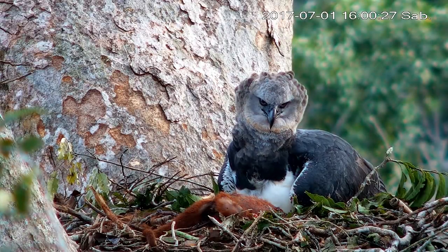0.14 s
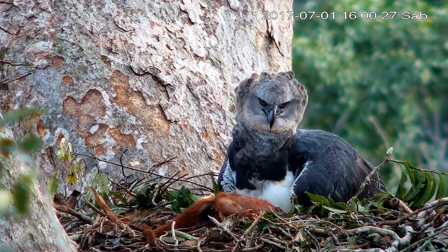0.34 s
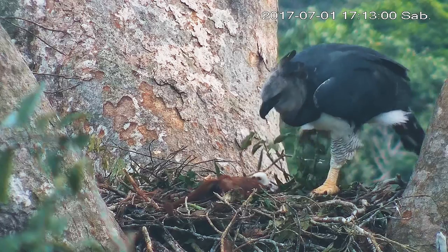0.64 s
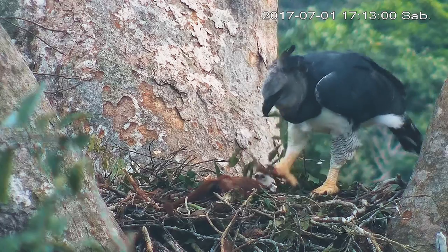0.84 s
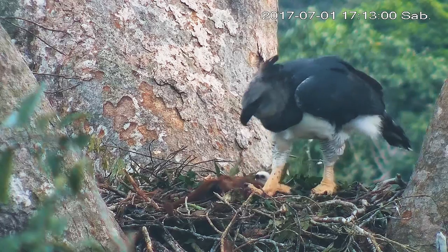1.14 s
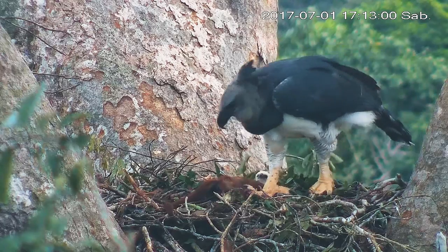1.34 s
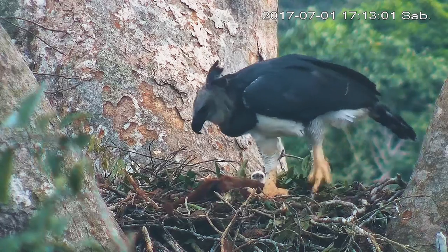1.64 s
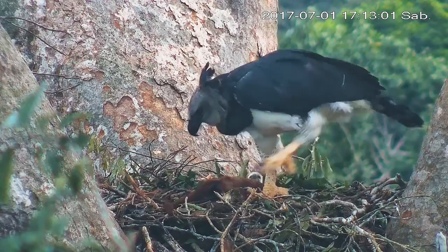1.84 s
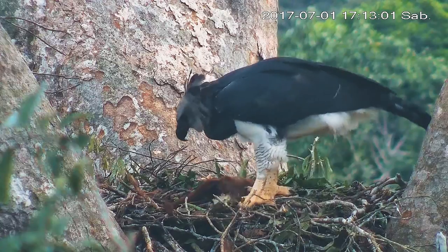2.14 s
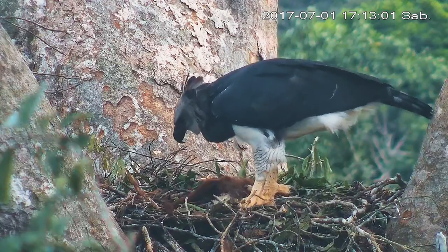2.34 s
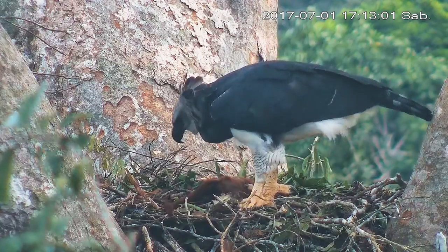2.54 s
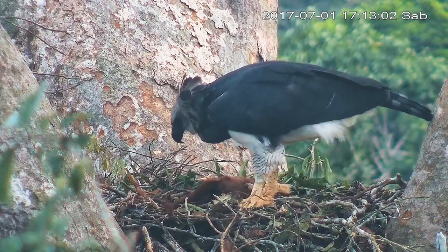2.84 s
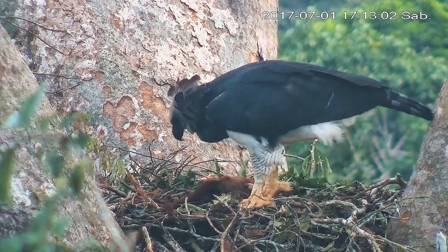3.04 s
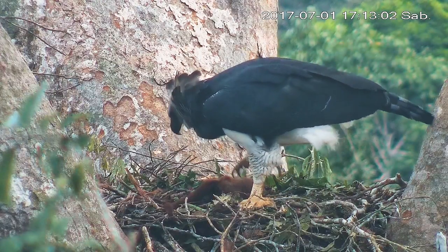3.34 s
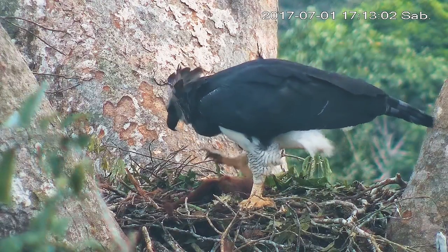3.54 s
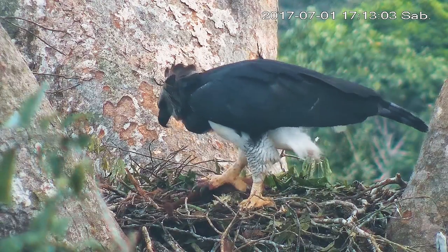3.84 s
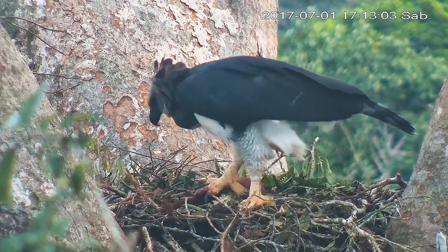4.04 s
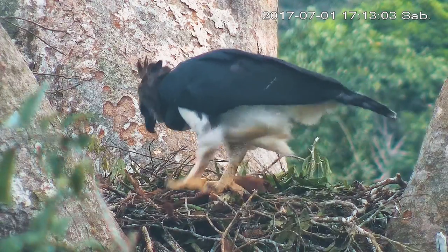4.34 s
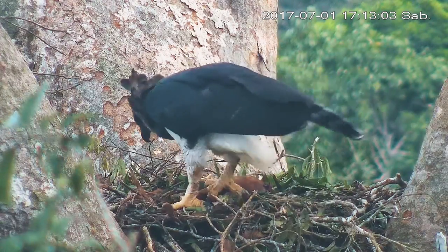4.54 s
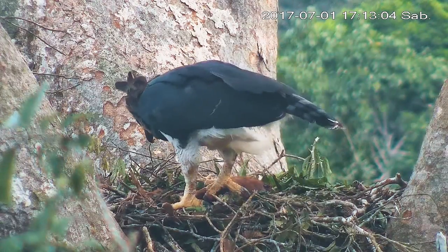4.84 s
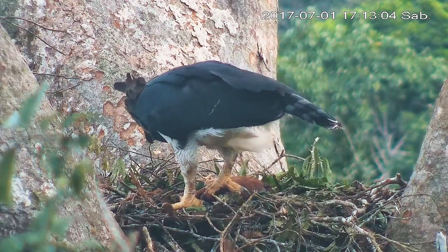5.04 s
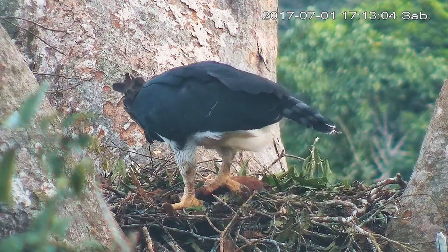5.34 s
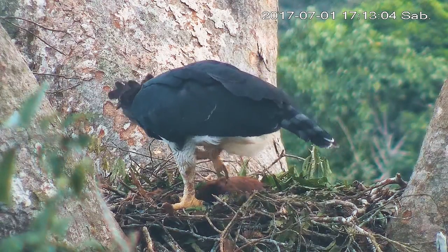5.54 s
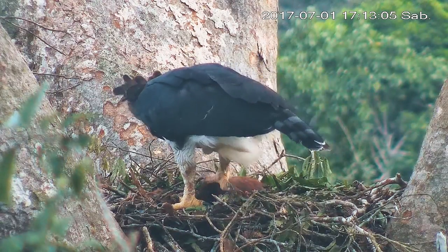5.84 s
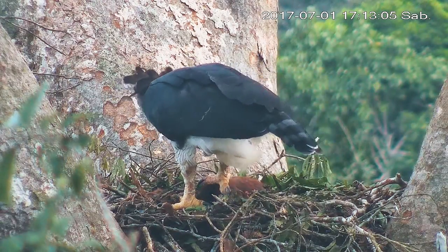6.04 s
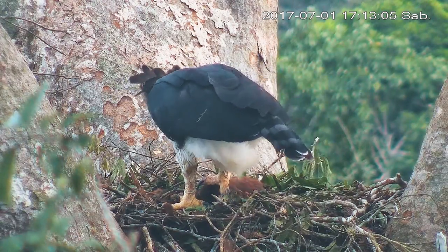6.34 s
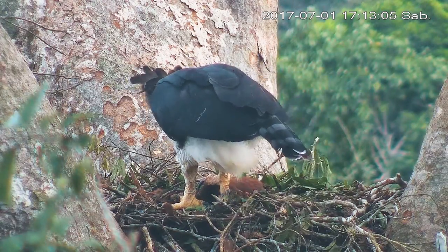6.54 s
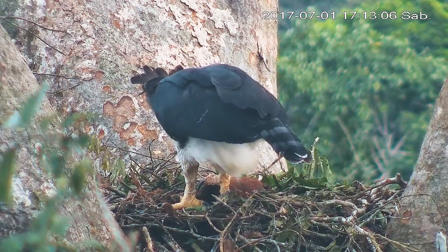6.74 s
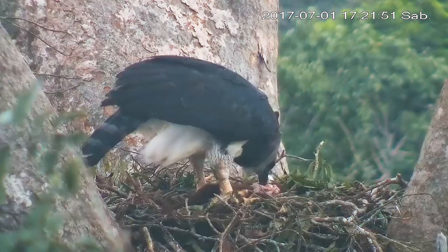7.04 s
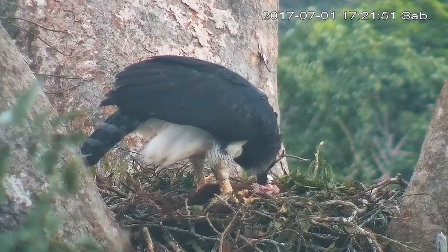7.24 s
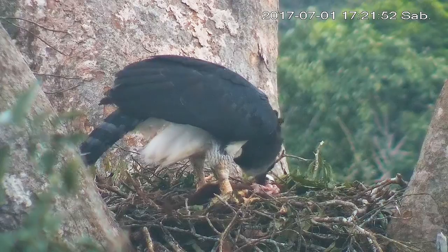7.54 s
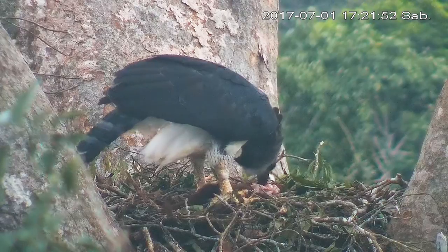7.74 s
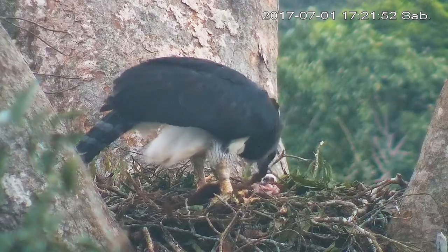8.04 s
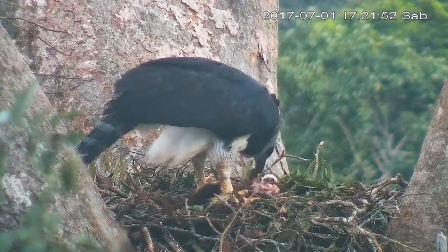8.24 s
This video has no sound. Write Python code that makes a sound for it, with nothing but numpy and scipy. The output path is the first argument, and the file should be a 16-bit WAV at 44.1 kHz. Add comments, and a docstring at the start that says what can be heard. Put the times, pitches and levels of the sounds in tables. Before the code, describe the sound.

High in a jungle tree, throbbing cicadas and shrill crickets continue as leaves rustle, dry twigs crack and birds briefly call.

```python
"""Rainforest canopy heard from a high nest: far air hisses, wind in far crowns swells, cicadas drone in a loose
throb and crickets sing in overlapping phrases. A fly passes, far rattles sound only as brief hisses, a bird
rattles twice on the left, twigs snap and another bird lets a whistle slide down. Filtered noise makes air, wind
and the far hisses; random clicks make cicadas; swept or steady sines make the rest, with noise in rattle and
snaps. Insects, birds and twigs, but not the fly, echo among the trunks. A faint steady high whine lies over it
all."""
import sys
import numpy as np
from scipy import signal
from scipy.fft import rfft, irfft, next_fast_len
from scipy.io import wavfile
from scipy.ndimage import uniform_filter1d, map_coordinates

SR = 44100
rng = np.random.default_rng(int(sys.argv[2]) if len(sys.argv) > 2 else 0)


def dump(signal):
    """Clip the signal to [-1, 1] and save it as 16-bit WAV at the path in sys.argv[1]."""
    limited = np.clip(np.atleast_2d(signal).T, -1, 1)
    pcm = np.round(limited * 32767).astype(np.int16)
    wavfile.write(sys.argv[1], SR, pcm)


N = 369558
T = np.arange(N) / SR


def amp(db):
    """Decibels to amplitude ratio."""
    return 10 ** (np.asarray(db) / 20)


def unit(x):
    """Normalization to a root-mean-square of 1."""
    return x / np.sqrt(np.mean(x ** 2) + 1e-20)


def along(points, hz):
    """Interpolation of (Hz, value) points on a logarithmic frequency axis."""
    f, v = np.transpose(points)
    return np.interp(np.log(hz + 1), np.log(f + 1), v)


def curves(rows):
    """Linear interpolation in time: one value per sample for each column after the time."""
    s, *cols = np.transpose(rows)
    return [np.interp(T, s, c) for c in cols]


def wobble(rate):
    """Band-limited random modulation: a smooth curve through random knots, rate knots a second."""
    knots = rng.standard_normal(int(N * rate / SR) + 4)
    return map_coordinates(knots, [T * rate])


def filtered(x, response):
    """Linear filtering: the spectrum of x times a response of frequency."""
    m = next_fast_len(N + SR // 4)
    return irfft(rfft(x, m) * response(np.fft.rfftfreq(m, 1 / SR)), m)[..., :N]


def sides(pan_db):
    """Interaural level difference: left and right gain from left-right dB."""
    return amp(np.array([pan_db / 2, -pan_db / 2])).reshape(2, -1)


def span(start, end, fade):
    """Gating: 1 between two times, with soft edges."""
    return np.clip(np.minimum(T - start, end - T) / fade + .5, 0, 1)


def trunks(x, t60, echo_db):
    """Diffuse reverberation: the direct sound plus dying echoes, unrelated in the two channels."""
    t = np.arange(int(t60 * SR)) / SR
    tail = rng.standard_normal((2, len(t))) * amp(-60 * t / t60)
    tail *= amp(echo_db) / np.linalg.norm(tail[0])
    tail[:, 0] = 1  # direct sound
    echoed = signal.oaconvolve(x * np.ones((2, 1)), tail, axes=1)[:, :N]
    return echoed / np.sqrt(1 + amp(2 * echo_db))


def air():
    """Interchannel coherence: mid and side noise mixed by frequency, a smooth far hiss nearly mono in the bass."""
    # spectrum of leaves and far wind: frequency_hz, relative density_db (per Hz)
    spectrum = [(15, -48), (25, -16), (40, -1.5), (59, -3), (200, -2), (400, -6.5), (670, -8.5), (1080, -7),
                (1500, -9), (2300, -8.5), (3400, -13), (5300, -17.5), (7000, -18.5), (9450, -20.5),
                (15600, -23.5)]
    # left-right likeness of the hiss: frequency_hz, correlation (1 is mono)
    likeness = [(35, .994), (87, .97), (177, .885), (354, .67), (707, .47), (1400, .37), (2800, .02),
                (6000, .08), (14000, .24)]

    def mid_side_gains(hz):
        angle = np.arccos(np.clip(along(likeness, hz), -1, 1)) / 2
        return amp(along(spectrum, hz)) * [np.cos(angle), np.sin(angle)]

    mid, side = filtered(rng.standard_normal((2, N)), mid_side_gains)
    level_db = -53 + 0.52 * wobble(1.224)
    return amp(level_db) * unit(np.array([mid + side, mid - side]))


def gust():
    """Band-shaped turbulence noise: a broad, dull rush whose level swells and settles."""
    # wind in far crowns: time_s, level_db
    swell = [(0, -74), (1.5, -76), (2.5, -64), (4.5, -72), (6, -69.5), (8.38, -68)]
    level_db, = curves(swell)
    shared, separate = rng.standard_normal(N), rng.standard_normal((2, N))
    rush = filtered(shared + separate, lambda hz: np.exp(-(np.log((hz + 1) / 920) / 0.45) ** 2))
    return amp(level_db) * unit(rush)


def cicadas():
    """Impulse excitation of a resonator: tymbals buckle at random in a common throb, each tree with its own echoes."""
    # slow course of the drone: time_s, level_db
    swell = [(0, -49), (1.1, -49.5), (2.2, -51), (3.9, -49.5), (4.6, -51.2), (6.0, -50.3), (7.2, -49.5),
             (7.75, -51), (8.38, -49.5)]
    # cicada body resonance: frequency_hz, relative density_db (per Hz)
    body = [(2210, -58), (3750, -15.5), (4120, -1), (4420, 3), (4640, -2), (5300, -21.5), (6890, -33),
            (11700, -120)]
    level_db, = curves(swell)
    throb_hz = 31 + 2.5 * wobble(3)
    throb = 1 + .35 * np.sin(2 * np.pi * np.cumsum(throb_hz) / SR)
    click_chance = 500 / SR * throb  # 500 clicks a second in each tree, on average
    trees = [(rng.random(N) < click_chance) * rng.standard_normal(N) for tree in range(8)]
    echoed = sum(trunks(clicks, t60=.25, echo_db=11.0) for clicks in trees)
    drone = filtered(echoed, lambda hz: amp(along(body, hz)))
    return amp(level_db + 0.52 * wobble(12)) * sides(-0.42) * unit(drone)


def crickets():
    """Stridulation: each wing stroke is a fresh tone that sags in pitch; a phrase starts low and warms up."""
    # one row a cricket: pitch_hz, chirp_rate_hz, warm_up_hz (drop at a phrase start), sag_hz (within a stroke),
    # level_db, left_right_db, phrases as (start_s, end_s)
    singers = [(7805, 18.5, 330, 420, -57.5, -2.3, [(-1, 2.13), (5.97, 9)]),
               (7890, 18.9, 150, 200, -62, 1, [(-1, 4.45), (6.6, 9)]),
               (7585, 18.4, 0, 70, -71, -4, [(-1, 9)]), (7435, 19, 0, 260, -70, -10, [(-1, 9)]),
               (8630, 33, 0, 96, -59.5, -2, [(-1, 1.52)]), (8600, 30, 60, 120, -66.5, -1, [(1.5, 5.3),
               (6.2, 9)]), (8825, 31, 200, 170, -60, 1, [(-1, .8), (1.15, 5.5), (6.07, 7.1), (7.3, 9)]),
               (8915, 29, 80, 55, -65.5, -5, [(-1, .7), (1.45, 4.1), (4.5, 7.9)]),
               (8360, 25, 40, 200, -70, -8, [(-1, 5.3), (6.2, 9)]),
               (8760, 37, 0, 350, -66.5, -1.5, [(-1, 9)]), (8480, 34, 0, 420, -71, -1, [(-1, 9)])]
    out = np.zeros((2, N))
    for hz, rate, warm_hz, sag_hz, db, pan_db, phrases in singers:
        stroke_hz = 3 * rate * (1 + .03 * wobble(15))  # three strokes a chirp
        strokes = np.cumsum(stroke_hz) / SR + 3 * rng.random()
        count, part = strokes.astype(int), strokes % 1
        phase, detune = rng.standard_normal((count[-1] + 1, 2))[count].T
        cold = sum(np.exp(-np.abs(T - start) / .12) for start, end in phrases)
        pitch = hz - sag_hz * part ** 2.5 - warm_hz * cold + 28 * detune
        size = np.sin(np.pi * part) ** 0.36 * amp(-4.5 * (count % 3))  # later strokes are weaker
        song = unit(size * np.sin(2 * np.pi * (np.cumsum(pitch) / SR + phase)))
        song = song * sum(span(start, end, 0.046) for start, end in phrases)
        out += amp(db) * sides(pan_db) * trunks(song, t60=.3, echo_db=9.5)
    return out


def fly():
    """Harmonic series: three multiples of a slightly unsteady wing beat."""
    # passes: start_s, end_s, wing_beat_hz, first_db, second_db, third_db (peak level of each multiple)
    passes = [(0.032, 0.456, 400, -65, -69.5, -69), (.5, .75, 396, -81.5, -64.5, -86.5),
              (1.42, 1.557, 408, -83.5, -65, -85)]
    out = np.zeros(N)
    for start, end, hz, *levels in passes:
        turns = 2 * np.pi * np.cumsum(hz + 2.4 * wobble(8)) / SR
        buzz = sum(amp(db) * np.sin((k + 1) * turns) for k, db in enumerate(levels))
        out += span(start, end, 0.072) * buzz
    return sides(1.5) * out


def far_rasps():
    """Exponential decay of noise: bright puffs that start fast and die away, far rattles heard only as hiss."""
    # far hisses: start_s, decay_s (fall to 1/e), level_db (at the start), low_edge_hz
    bursts = [(0.988, 0.11, -49.5, 2210), (1.19, .03, -68, 6000), (5.515, .06, -56, 7000)]
    out = np.zeros((2, N))
    for s, decay_s, db, low_hz in bursts:
        bright = lambda hz: (hz / low_hz) ** 3 / (1 + (hz / low_hz) ** 4.26)
        leaf = unit(filtered(rng.standard_normal((2, N)), bright))
        out += amp(db) * leaf * span(s, s + 1, .008) * np.exp(-np.abs(T - s) / decay_s)
    return out


def rattle():
    """Source and filter: rough chirps plunge through a set of resonant peaks, each with a rasping puff of air."""
    # calls: first_note_s, pause_s (before the roll), drive_db (peak of each of six notes ahead of the peak
    # filter)
    calls = [(3.14, .0736, [-41, -39, -44, -45, -38.5, -43]),
             (6.5859, .0792, [-40.5, -47, -39.5, -45, -39, -39])]
    # resonant peaks that colour each note: frequency_hz, width_hz, gain_db
    peaks = [(1620, 200, -6), (1890, 190, 0), (2330, 150, -2.5), (2570, 130, -2.5), (3400, 300, -16)]
    # hiss of a note: frequency_hz, relative density_db (per Hz)
    hiss = [(1000, -58), (1500, -6), (2500, 1.5), (3500, -6), (5500, -2), (8000, -7.5), (12000, -8.5),
            (14300, -12.5), (15700, -11)]
    step_s, catch_s, puff_db = .0326, .0063, -41  # gap between roll notes, extra wait after three, hiss level
    before, after = 500, 700  # samples around a note's onset
    t = np.arange(-before, after) / SR
    notes, puffs = np.zeros(N), np.zeros(N)
    roll = step_s * np.arange(5) + catch_s * (np.arange(5) >= 3)
    for first, pause, levels in calls:
        for s, db in zip(np.append(first, first + pause + roll), levels):
            at = slice(round(s * SR) - before, round(s * SR) + after)
            roughness = uniform_filter1d(rng.standard_normal(len(t)), size=40)
            hz = 2080 - 90000 * t + rng.normal(0, 30) + 550 * roughness
            swell = np.exp(-((t - .0005) / 0.0061) ** 4)
            notes[at] += amp(db) * swell * np.sin(2 * np.pi * np.cumsum(hz) / SR)
            puffs[at] += amp(puff_db) * np.exp(-((t - .002) / 0.0062) ** 2)

    def colour(f):
        # parallel resonances of alternating sign
        return sum((-1) ** k * amp(db) * 1j * f * width / (center ** 2 - f * f + 1j * f * width)
                   for k, (center, width, db) in enumerate(peaks))

    voice = trunks(filtered(notes, colour), t60=0.46, echo_db=-3.5)
    rasp = puffs * unit(filtered(rng.standard_normal(N), lambda hz: amp(along(hiss, hz))))
    return sides(9.1) * voice + trunks(rasp, t60=.4, echo_db=5)


def snaps():
    """Damped modal vibration: a noise crack and the short ring of dry wood."""
    # twigs: time_s, ring_db, left_right_db, crack_db (over the ring)
    twigs = [(4.0222, -51, -.6, 1), (4.567, -52, -2.5, -3), (7.1526, -39.5, -1.8, 4.5)]
    # wood modes: frequency_hz, level_db (within the ring), t60_s
    modes = [(960, -3, .05), (1330, -4, .03), (2150, -2, .018), (3600, -9, .015)]
    out, t = np.zeros((2, N + SR)), np.arange(SR // 10) / SR
    for s, db, pan_db, crack_db in twigs:
        ring = sum(amp(level + rng.normal(0, 2.5) - 60 * t / t60) * np.sin(2 * np.pi * hz * t)
                   for hz, level, t60 in modes)
        # a three-sample average dulls the crack
        crack = amp(crack_db - 60 * t / 0.044) * uniform_filter1d(rng.standard_normal(len(t)), size=3)
        out[:, round(s * SR):][:, :len(t)] += amp(db) * sides(pan_db) * (ring + crack)
    return trunks(out[:, :N], t60=0.16, echo_db=-4)


def whistle():
    """Joint frequency and amplitude modulation: slurred falling notes whose warble widens and quickens to a trill."""
    # notes running into one another: start_s, pitch_hz, level_db
    notes = [(5.16, 3700, -54), (5.255, 3700, -51.5), (5.44, 3660, -62), (5.515, 3655, -55),
             (5.6, 3655, -53.5), (5.73, 3634, -50.5), (5.89, 3605, -52.5), (6.06, 3570, -51),
             (6.2, 3520, -51.5), (6.29, 3450, -55), (6.38, 3370, -56), (6.47, 3310, -58)]
    end_s, fade_db_per_s, slur_s = 6.62, 60, .02
    start_depth_hz, widen = 4, .34  # warble depth at the start; Hz of depth gained per Hz of fall
    # first rate, last rate, fall that covers most of the change
    warble_per_s, trill_per_s, quicken_hz = 12, 50, 120
    starts, pitches, levels = np.transpose(notes)
    note = np.clip(np.searchsorted(starts, T) - 1, 0, None)
    slur = lambda steps: uniform_filter1d(steps, size=round(slur_s * SR))
    hz = slur(pitches[note])
    level_db = slur(levels[note] - fade_db_per_s * np.abs(T - starts[note]))
    fall_hz = pitches[0] - hz
    depth_hz = start_depth_hz + widen * fall_hz
    rate = trill_per_s - (trill_per_s - warble_per_s) * np.exp(-fall_hz / quicken_hz)
    warble = np.sin(2 * np.pi * np.cumsum(rate * (1 + .45 * wobble(25))) / SR)
    chop = 1 + np.clip(depth_hz / 40, 0, .5) * warble  # the warble also chops the airflow
    warbled_hz = hz + depth_hz * (warble + .7 * wobble(140))
    tone = np.sqrt(2) * np.sin(2 * np.pi * np.cumsum(warbled_hz) / SR)
    tone = tone * chop * amp(level_db) * span(starts[0], end_s, .03) * sides(1.8)
    return trunks(tone, t60=.45, echo_db=-1.5)


def scene():
    """Linear superposition of all sources."""
    return air() + gust() + cicadas() + crickets() + fly() + far_rasps() + rattle() + snaps() + whistle()


def record(dry):
    """Band limitation: a faint steady high whine joins the scene and nothing sounds above the limit."""
    # steady whine: frequency_hz, level_db
    whine_tones = [(15735, -89)]
    top_hz = 15775
    whine = sum(np.sqrt(2) * amp(db) * np.sin(2 * np.pi * hz * T) for hz, db in whine_tones)
    return filtered(dry + whine, lambda hz: hz < top_hz)


dry = scene()
out = record(dry)
dump(out)
```